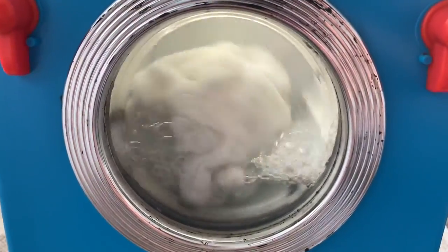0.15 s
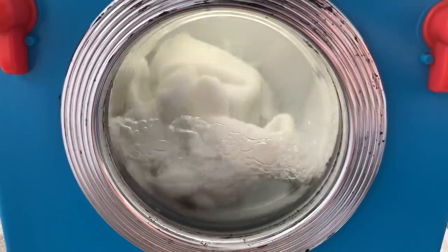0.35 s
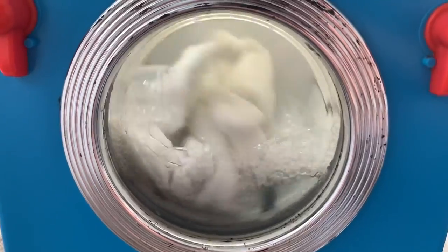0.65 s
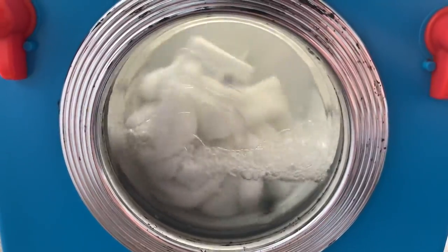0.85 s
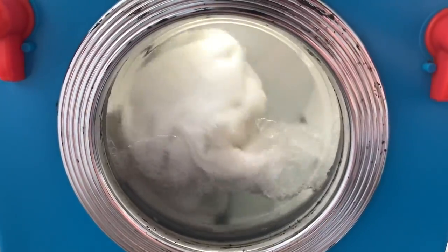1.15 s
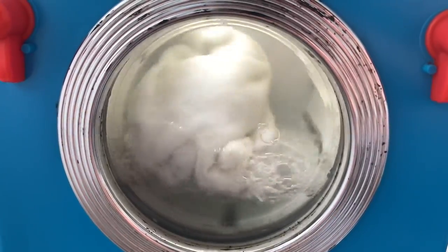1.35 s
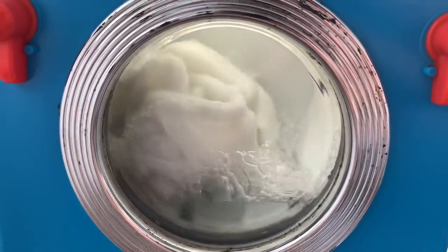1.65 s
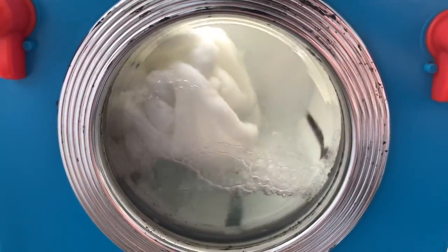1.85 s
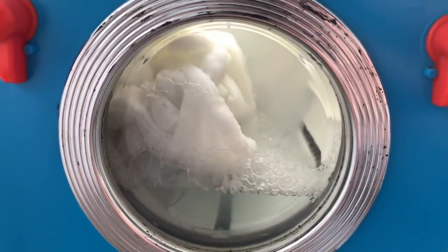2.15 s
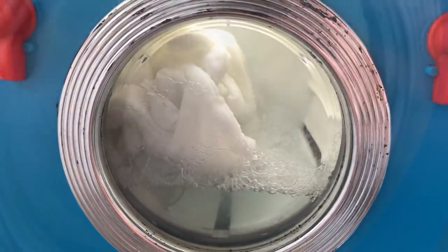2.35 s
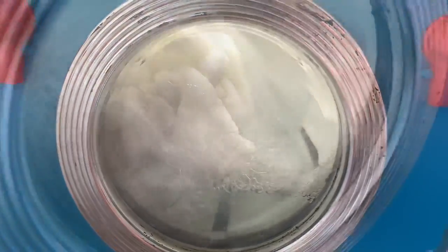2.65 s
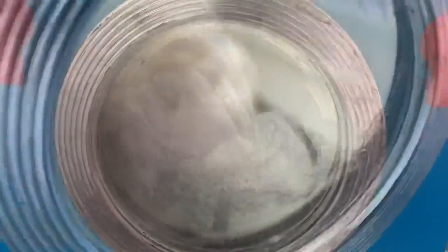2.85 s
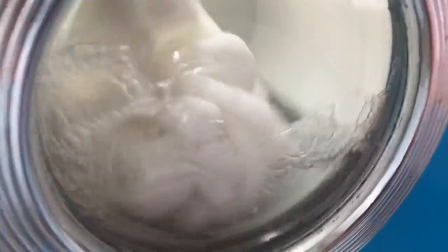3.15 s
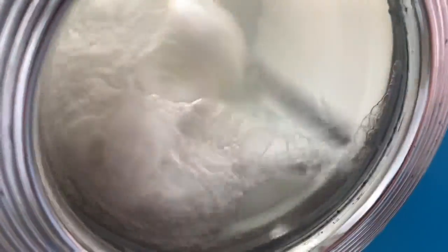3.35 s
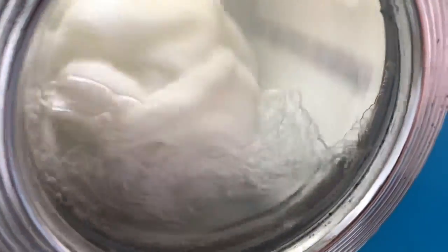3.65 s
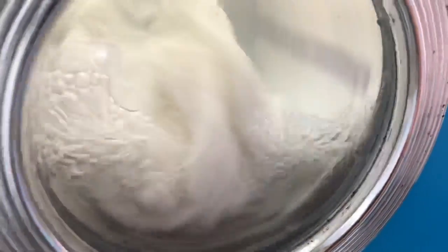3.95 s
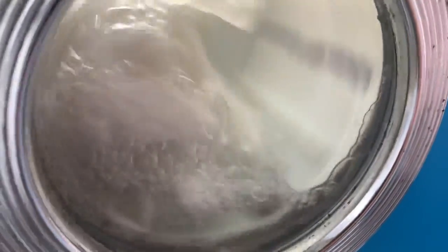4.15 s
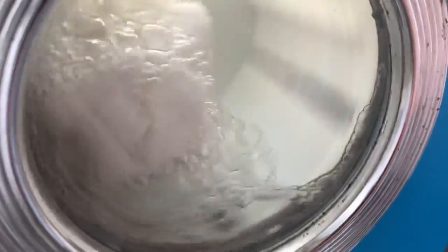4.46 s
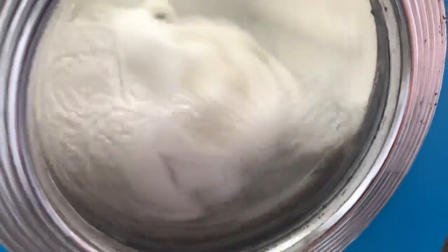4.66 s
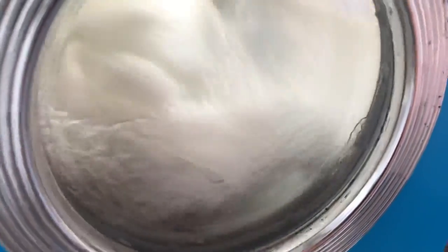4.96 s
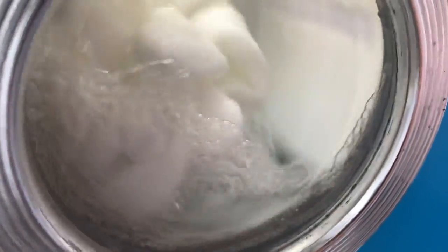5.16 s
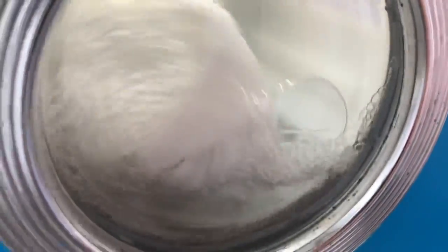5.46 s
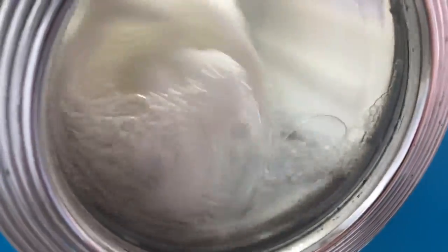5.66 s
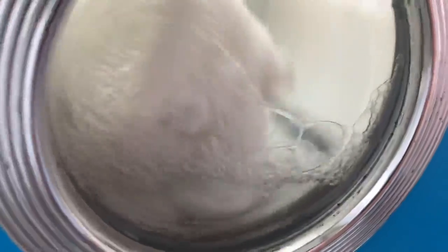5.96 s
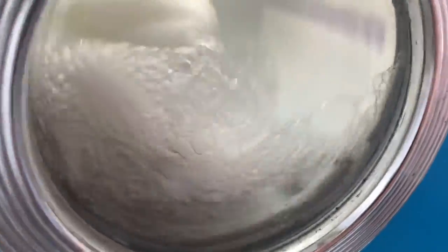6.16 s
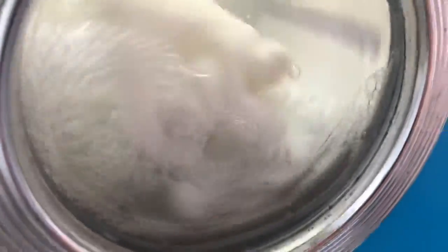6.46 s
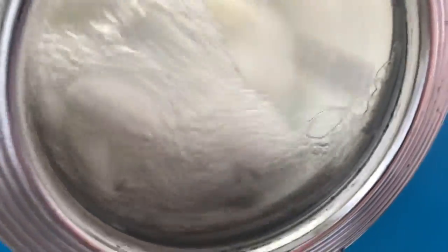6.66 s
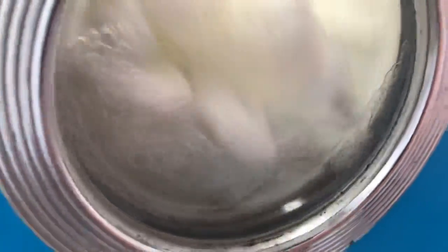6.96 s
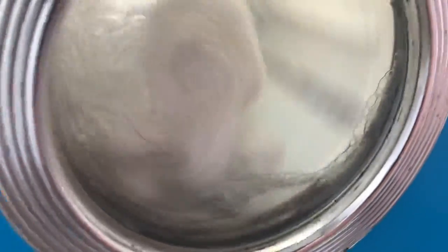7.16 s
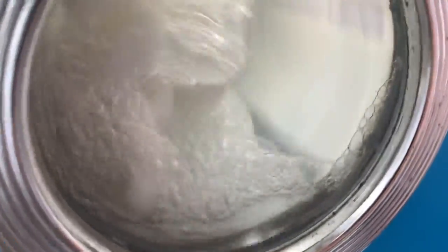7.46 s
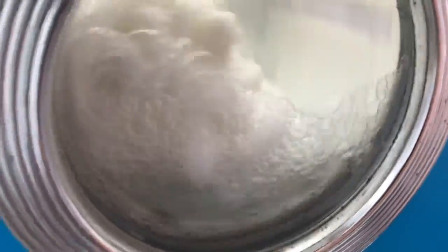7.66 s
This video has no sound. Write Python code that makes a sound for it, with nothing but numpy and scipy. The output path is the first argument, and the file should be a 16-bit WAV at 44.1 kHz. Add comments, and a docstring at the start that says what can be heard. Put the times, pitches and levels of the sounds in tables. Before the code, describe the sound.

A small toy washing machine runs in a quiet little room, heard in stereo. From 0 to 1.6 seconds its geared motor whirrs thinly at a distance, with soft slosh, low gulps and light taps; between 1.1 and 1.5 the wet load knocks harder, with a short thin swish near 1.4. The motor coasts to rest by 2.0, leaving low hum, still air and a faint high whine. At about 2.3 it starts again, spinning up until 3.0, now closer and louder, a steady buzzy gear hiss. Hollow plastic knocks fall irregularly, clustered around 2.9 to 3.1, strong at 3.65, 4.3, 5.7, 6.4 and 7.6. Each stirs splashes, spray and foamy crackle; air pockets pop, clearly at 2.9, 5.6 and 6.5. From 3.1 a brief fizzy swish returns roughly every 0.6 seconds. The motor is still running at the end, near 7.8.

```python
"""A geared motor whirrs at some distance and water sloshes: a toy washing machine tumbles a wet cloth.
The load knocks in the plastic drum as ringing modes; the motor rests, then runs again, heard from closer by.
The rim swishes about once a turn as a burst of coloured noise; spray, foam and air pockets are noise and bubbles.
A low hum and still air lie beneath, and a faint whine marks the pause; two microphone ports hear it all."""
import sys
import numpy as np
from scipy import signal
from scipy.fft import rfft, irfft, next_fast_len
from scipy.io import wavfile
from scipy.ndimage import map_coordinates

SR = 44100
rng = np.random.default_rng(int(sys.argv[2]) if len(sys.argv) > 2 else 0)


def log_audio(samples):
    """Write samples as a 16-bit WAV file to the path given in sys.argv[1]."""
    # one column per channel
    frames = np.atleast_2d(samples).T
    # limit to full scale, then quantise
    limited = np.clip(frames, -1, 1)
    pcm = np.round(limited * 32767).astype(np.int16)
    wavfile.write(sys.argv[1], SR, pcm)


N = 344421  # length in samples

# The load knocking in the drum. Each row: time in seconds, level in dB, then trims in dB of thump, clack
# and tick against the shell, and the pitch in Hz that the place of the blow favours.
KNOCK_ROWS = [(0.4165, -50, 7.5, -19, -32, 455), (0.606, -58.5, -1, -2, -25, 1770),
              (0.714, -58, 5, -27, -22, 556), (1.1139, -43, 0.5, -5, -11, 1160),
              (1.1597, -42.5, -7, -11, -14, 1770), (1.237, -38, 3.5, 3, -4.5, 950),
              (1.262, -42.5, 0, -10, -22, 620), (1.4144, -40, 0, -14, -3, 1700),
              (1.4213, -34, -5, -11.5, -17, 590), (1.509, -31.5, 0, -38, -28, 586),
              (2.3201, -44.5, -0.5, -7.5, -16, 1140), (2.433, -37.5, 0, -8, -17, 1346),
              (2.6466, -51.5, 2, -7, -10, 971), (2.807, -55, 4, -3, -16, 2460),
              (2.875, -39, -12, -4.5, -39, 930), (2.8967, -36.5, -19, -4, -26, 1680),
              (2.9038, -44, 2, -11, -12, 1120), (2.9338, -40, 0, -5, -34, 1820),
              (3.026, -33.5, 2, -9, -10, 650), (3.0577, -31.5, 5, -6.5, -7.5, 689),
              (3.2754, -42.5, -0.5, -8.5, -25, 745), (3.4339, -45.5, 4, -10, -11, 950),
              (3.565, -62.5, -14, 13.5, -6, 2530), (3.6095, -29.5, -1.5, 4, -3, 1710),
              (3.6232, -30.5, 1, -1.5, -15, 960), (3.646, -22.5, -3, -6, -3, 630),
              (3.6495, -28, 2, 3, -24, 590), (3.6525, -32.5, 13, -19, -25, 346),
              (3.9054, -40, -2, 1, -32, 1520), (3.996, -36, 4.5, -3.5, -12.5, 1780),
              (4.0344, -39, 7, -6.5, -9, 484), (4.213, -46.5, -10, -8, -26, 980),
              (4.2719, -41, -4, 10, 4, 1770), (4.2746, -29.5, 3.5, 0, -5.5, 600),
              (4.3023, -28, 3.5, 1, -8, 1730), (4.317, -33.5, -9, -12, -18, 540),
              (4.3482, -29.5, 4, -10, -14, 905), (4.6229, -32.5, 7, 1.5, -4, 1136),
              (4.7492, -45, -8, -20, -26, 1160), (4.915, -43, -3, -10, -11, 1250),
              (5.049, -35.5, -6, 4.5, -18, 1640), (5.1349, -35.5, 0, -3, 7, 1090),
              (5.1624, -30.5, 5, -8.5, -16, 650), (5.2305, -40.5, -11, -10, -18, 1050),
              (5.368, -37, 8, -12, -48, 580), (5.438, -38.5, -16, 3.5, -18, 1910),
              (5.4758, -40.5, 1, -6, -13, 950), (5.5391, -44, -9, -4, -11, 1020),
              (5.6058, -36.5, -4, -12, -11, 955), (5.7158, -24.5, -6, -14, -28, 690),
              (5.8062, -46.5, 6, -24, -31, 654), (5.85, -44, 5, -20, -31, 455),
              (5.875, -45, -8, -6.5, -23, 1170), (6.023, -33, -12, 3, -3.5, 1890),
              (6.0757, -33.5, -6.5, -2.5, -10, 950), (6.2948, -47, -4, -13, -18, 1610),
              (6.384, -40.5, -5, -11, -16, 930), (6.4265, -28, -5.5, -5, -13, 990),
              (6.443, -34.5, 8, -7.5, -12, 600), (6.5212, -42.5, 3.5, -27, -34, 990),
              (6.6315, -40.5, -0.5, -13, -20, 1040), (6.951, -43.5, 5, -22, -11, 1000),
              (7.016, -50.5, 13.5, -0.5, -8, 460), (7.0409, -38.5, 0, -3, -18, 1320),
              (7.1902, -42.5, 5, 0.5, -45, 1890), (7.2662, -47, 6, -1, -8, 970),
              (7.527, -38.5, -11, -6, -25, 960), (7.5383, -39.5, 0.5, 3.5, -14.5, 1690),
              (7.63, -27.5, 1, -1, -12, 288), (7.745, -44.5, -15, -11, -23, 990),
              (7.773, -38.5, -2.5, -10, -32, 670), (7.804, -42.5, -6, -5.5, -11, 1000)]
# The rim at its tight spot. Each row: time in seconds, swish gain in dB ahead of its envelope.
SWISH_ROWS = [(0.45, -85), (0.9, -79), (1.3678, -43.5), (3.1378, -45.5), (3.7606, -46), (4.4933, -43.5),
              (4.996, -42), (5.5802, -47.5), (6.1414, -44.5), (6.708, -44), (7.291, -47.5), (7.784, -45.5)]

STOP_S, REST_S = 1.57, 1.97  # the motor is cut, and has coasted to rest
START_S, SPIN_UP_S = 2.31, 0.72  # it starts again, and takes this long to full drive
FIRM_KNOCK_DB = -32  # a knock this loud counts as fully firm


def amp(db):
    """Decibels to gain."""
    return 10 ** (np.asarray(db) / 20)


def unit(x):
    """Scaled to rms 1."""
    return x / np.sqrt(np.mean(x ** 2) + 1e-20)


def along(points, hz):
    """(Hz, value) points read on a log frequency axis."""
    f, v = np.transpose(points)
    return np.interp(np.log(hz + 1), np.log(f + 1), v)


def curves(rows):
    """One value per sample for each column after the time."""
    s, *cols = np.transpose(rows)
    return [np.interp(np.arange(N) / SR, s, c) for c in cols]


def wobble(rate):
    """A smooth random curve, rate knots a second."""
    knots = rng.standard_normal(int(N * rate / SR) + 4)
    return map_coordinates(knots, [np.arange(N) * rate / SR])


def filtered(x, response):
    """x times a response of frequency."""
    m = next_fast_len(N + 8192)
    return irfft(rfft(x, m) * response(np.fft.rfftfreq(m, 1 / SR)), m)[..., :N]


def panned(x, db):
    """Left louder than right by db."""
    gains = amp([[db / 2], [-db / 2]])
    return x * unit(gains)


def noise():
    """Two channels of white noise."""
    return rng.standard_normal((2, N))


def resonances(modes, hz):
    """Summed response of (Hz, width in Hz, dB) resonances."""
    return sum(amp(db) * 1j * hz * width / (centre ** 2 - hz ** 2 + 1j * hz * width)
               for centre, width, db in modes)


def spread(pair, spectrum, modes=()):
    """Two unrelated signals become one stereo sound of rms 1, coloured by a spectrum and any resonances."""
    # How alike left and right are in a spread sound. Each row: frequency in Hz, likeness up to 1.
    likeness = [(60, 0.94), (280, 0.95), (550, 0.66), (1000, 0.1), (4000, 0.041), (6500, 0.77), (8500, 1),
                (14000, 0.96)]

    def mid_side_response(hz):
        turn = np.arccos(np.clip(along(likeness, hz), -1, 1)) / 2
        colour = np.hypot(amp(along(spectrum, hz)), abs(resonances(modes, hz)))
        return colour * [np.cos(turn), np.sin(turn)]

    mid, side = filtered(pair, mid_side_response)
    return unit(np.array([mid + side, mid - side]))


def add(track, s, sound):
    """Mixes a sound into a track at a time in seconds."""
    start = int(np.clip(round(s * SR), 0, N - 1))
    track[:, start:start + sound.shape[1]] += sound[:, :N - start]


def bubbles(centre_hz, cycles, scatter_db, count):
    """Short, heavily damped rings of random pitch and size at random times, together at rms 1."""
    when, pitch, size = rng.random(count), rng.standard_normal(count), rng.exponential(size=count)
    life = np.arange(int(min(10 * cycles / centre_hz * SR, SR // 25)))
    turns = centre_hz * np.exp(.33 * pitch)[:, None] * life / SR
    ring = np.sin(2 * np.pi * turns) * np.exp(-turns / cycles) * (1 - np.exp(-2 * turns))
    ring = ring * amp(scatter_db * np.minimum(size, 2))[:, None]
    at = (when * N).astype(int)[:, None] + life
    return unit(np.bincount(at.ravel(), ring.ravel(), N)[:N])


def bubble_pair(*args, **settings):
    """Two unrelated channels of bubbles."""
    return np.array([bubbles(*args, **settings) for port in range(2)])


def drive():
    """Drive of the first and second run, 0 to 1: one coasts to rest, the other spins up."""
    t = np.arange(N) / SR
    coasting = np.clip((REST_S - t) / (REST_S - STOP_S), 0, 1)
    spinning_up = np.clip((t - START_S) / SPIN_UP_S, 0, 1)
    return coasting, spinning_up


def drag():
    """The gears labour just after the rim meets its tight spot: extra gear noise in dB."""
    rise_db, half_s, lag_s = 2.5, 0.22, 0.09
    t = np.arange(N) / SR
    return rise_db * sum(np.exp(-((t - s - lag_s) / half_s) ** 2) for s, _ in SWISH_ROWS)


def motor(run, hiss_spectrum, housing, mesh_hz, jitter, hiss_db, mesh_db, brush_db, waver,
          hiss_grows, mesh_grows):
    """Gear teeth mesh unsteadily, their flanks hiss in the gearbox, brushes tick once a turn; all grow with drive."""
    pinion_teeth, wheel_teeth = 10, 64
    wheel_pulse_db, tooth_flutter_db = 2.6, 3
    # Colour of the brush ticks. Each row: frequency in Hz, level in dB.
    spark_colour = [(6000, -70), (12300, -15), (13200, -4), (14500, -2), (15300, -10), (16000, -12)]
    rate = mesh_hz * (1 + waver * wobble(9))
    rotor = np.cumsum(rate / pinion_teeth * (1 + 0.07 * wobble(40))) / SR
    wheel = np.cumsum(rate / wheel_teeth * (1 + 0.05 * wobble(20))) / SR
    rub_db = wheel_pulse_db * (np.cos(np.pi * wheel) ** 8 - 1 / 4)  # the wheel rubs harder once a turn

    hiss_level = amp(hiss_db + 1.1 * wobble(105) + 0.64 * wobble(21))
    hiss = hiss_level * spread(noise(), hiss_spectrum, housing)
    tick_level = amp(3.6 * np.cos(2 * np.pi * rotor) + 2.2 * wobble(110))
    ticks = amp(brush_db) * unit(tick_level * spread(noise(), spark_colour))

    def tooth_tone():
        turns = np.cumsum(rate * (1 + jitter * wobble(260))) / SR
        return np.sin(2 * np.pi * turns) * amp(tooth_flutter_db * wobble(70))

    teeth = amp(mesh_db) * unit(np.array([tooth_tone() for port in range(2)]))
    rubbing = run ** hiss_grows * hiss + run ** 1.5 * ticks
    return amp(drag() + rub_db) * rubbing + run ** mesh_grows * teeth


def chatter(weight, lead, count):
    """A heavy blow is a cluster: light touches just before it, quick rebounds, then a few stray bounces."""
    bounce_db, bounce_s = -23, .045
    contacts = np.zeros(SR // 10)
    early, late, stray = rng.random((3, count))
    touch_at = (lead * (1 - early) * SR).astype(int)
    rebound_at = ((lead + .012 * late) * SR).astype(int)
    bounce_at = ((lead + bounce_s * stray) * SR).astype(int)
    contacts[touch_at] += .08 * (1 - early) ** 2 * rng.standard_normal(count)
    contacts[rebound_at] += .22 * (1 - late) * rng.standard_normal(count)
    contacts[bounce_at] += amp(bounce_db) * (1 - stray) * rng.standard_normal(count)
    contacts = weight * contacts
    contacts[int(lead * SR)] = 1  # the blow itself
    return contacts


def knock_band(contacts, ring_hz, lo_hz, hi_hz, dense_db, dense_t60, attack):
    """One register of a knock, with the energy of 10 ms at rms 1: plastic modes plus dense, fast-dying ones."""
    # Modes of drum and housing. Each row: nominal pitch in Hz, relative level in dB, nominal t60 in seconds.
    plastic_modes = [(228.3, -9, .2), (291.8, 4, 0.11), (344, 1.5, .11), (402, -0.5, 0.071),
                     (445, -3, 0.058), (511.5, -2, 0.071), (590.4, 2, .12), (650, 3, .09), (741, 1, 0.096),
                     (956, 1, 0.054), (1175, -2, 0.048), (1343, -6.5, 0.086), (1595, 7.5, 0.047),
                     (1763, 4, 0.062), (1928, 8, 0.047), (2468, 4.5, 0.041), (2846, 2, .031),
                     (3327, 5.5, 0.026)]
    alike = 0.76  # a knock reaches both microphone ports almost alike
    t = np.arange(SR // 7) / SR
    in_band = [m for m in plastic_modes if lo_hz <= m[0] < hi_hz] or [(lo_hz, -120, dense_t60)]
    hz, db, t60 = np.array(in_band).T[..., None]
    db = db + 8 * np.exp(-(np.log(hz / ring_hz) / 0.13) ** 2)  # the place of the blow favours one mode

    turn = np.arccos(np.clip(alike, -1, 1)) / 2 * min(hi_hz / 1000, 1)  # the bass is nearly mono
    apart = turn * rng.standard_normal(hz.shape)
    detuned = hz * (1 + 0.006 * rng.standard_normal(hz.shape))
    phase = 2 * np.pi * (detuned * t + rng.random(hz.shape))
    decay = amp(db + 2 * rng.standard_normal(hz.shape) - 60 * t / t60)
    decay = decay * (1 + 2.0 * np.exp(-hz * t / 4.4))  # the first few swings are the widest
    modes = np.array([(decay * np.sin(phase + side * apart)).sum(0) for side in (1, -1)])

    band = signal.butter(2, [lo_hz, min(hi_hz, SR / 2 - 1000)], "band", fs=SR, output="sos")
    mid, side = rng.standard_normal((2, len(t))) * amp(-60 * t / dense_t60)
    burst = signal.sosfilt(band, np.cos(turn) * mid + np.sin(turn) * np.array([side, -side]))

    ring = modes / (np.linalg.norm(modes) + 1) + amp(dense_db) * burst / np.linalg.norm(burst)
    ring = signal.fftconvolve(ring * (1 - np.exp(-t / attack)), contacts[None], axes=1)
    return ring / np.linalg.norm(ring.mean(0)) * np.sqrt(SR / 100)


def knocks():
    """The load strikes the drum: tick, clack, shell and hollow ring speak fast, housing thump and boom swell slower."""
    out = np.zeros((2, N))
    lead = .005  # seconds of light touches ahead of the blow
    hollow_left_db, shell_left_db, clack_left_db = 11, 6, 2.5
    hollow_per_db, hollow_max_db = 0.5, 2
    for s, db, thump_db, clack_db, tick_db, ring_hz in KNOCK_ROWS:
        weight = min(amp(db - FIRM_KNOCK_DB), 1)  # light taps are nearly single, clean contacts
        blow = chatter(weight, lead, count=4)
        # heavy, dull blows reach further into the drum's hollow ring
        hollow_db = min(hollow_per_db * (thump_db - clack_db + db - FIRM_KNOCK_DB), hollow_max_db)
        thump = amp(thump_db - 0.86) * knock_band(
            blow, ring_hz, 240, 483, dense_db=-7.0, dense_t60=0.099, attack=0.0043)
        boom = amp(thump_db - 18.5) * knock_band(
            blow, ring_hz, 79, 233, dense_db=0, dense_t60=0.24, attack=0.019)
        hollow = amp(hollow_db + 1.0) * knock_band(
            blow, ring_hz, 480, 800, dense_db=-10, dense_t60=0.06, attack=0.0011)
        shell = amp(-1.5) * knock_band(
            blow, ring_hz, 744, 1510, dense_db=-3.5, dense_t60=0.055, attack=0.00046)
        strike = blow * (np.arange(len(blow)) / SR < lead + .006)  # later wet bounces are too soft to clack
        clack = amp(clack_db + 1.5) * knock_band(
            strike, ring_hz, 1100, 3500, dense_db=-6.5, dense_t60=0.021, attack=0.0004)
        tick = amp(tick_db - 1.5) * knock_band(
            strike, ring_hz, 3700, 15600, dense_db=-4.0, dense_t60=0.011, attack=0.000088)
        drum = panned(hollow, hollow_left_db) + panned(shell, shell_left_db)
        knock = thump + boom + drum + panned(clack + tick, clack_left_db)
        add(out, s - lead - .0003, amp(db) * knock)
    softened_top = [(3000, -1.5), (4200, -2.5), (6500, -4.0), (15000, -12.5)]  # Hz, dB
    return filtered(out, lambda hz: amp(along(softened_top, hz)))


def rim():
    """About once a turn the wet rim rubs past a tight spot: a short, thin swish with a trailing fizz."""
    # Colour of the swish. Each row: frequency in Hz, level in dB.
    swish_colour = [(2500, 0.5), (6500, -2), (7600, 0), (9000, 5), (13000, 7), (15400, 7), (16200, -9)]
    level, t = np.zeros(N), np.arange(N) / SR
    for s, db in SWISH_ROWS:
        age = np.maximum(t - s + 0.0026, 0)
        fading = np.exp(-age / 0.011) + 0.17 * np.exp(-age / 0.029)
        level += amp(db) * (1 - np.exp(-age / 0.0017)) * fading
    return level * spread(noise(), swish_colour)


def stir():
    """The water heaves as the load falls and settles after each knock; light knocks stir it less."""
    rise_s, settle_s = 0.039, 0.11
    limit = 1.9  # it heaves no harder than for this many firm knocks at once
    t = np.arange(N) / SR
    power = np.zeros(N)
    for s, db, *_ in KNOCK_ROWS:
        age = t - s
        swell = np.exp(np.minimum(age / rise_s, -age / settle_s))
        power += (min(amp(db - FIRM_KNOCK_DB), 1) * swell) ** 2
    return np.sqrt(power / (1 + power / limit))


def water():
    """Water gulps in the tub, the wet cloth slaps and drips over a soft wash; the drum and the knocks stir both."""
    # Colour of the water in the tub. Each row: frequency in Hz, level in dB.
    slosh_colour = [(25, -32), (45, -31), (70, 6), (110, 4), (145, -1.5), (200, -2.5), (235, 5),
                    (262, -10.5), (300, 6.5), (370, -2.5), (450, -4), (700, -27), (1500, -72)]
    # Colour of the slapping, dripping cloth. Each row: frequency in Hz, level in dB.
    splash_colour = [(250, -2), (480, 2), (700, 3.5), (820, -1), (970, 4.5), (1300, 3.5), (1800, 3),
                     (2200, -14), (2600, -23), (4000, -40), (9000, -70)]
    # base levels in dB for the pause, the distant first run, the close second run, and a full heave
    slosh_rest_db, slosh_far_db, slosh_near_db, slosh_stir_db = -72.5, -66.5, -53.5, -51.5
    splash_rest_db, splash_far_db, splash_near_db, splash_stir_db = -81, -64, -59.5, -54
    far, near = np.array(drive()) ** 1.04
    heave = stir()
    slosh_turning = amp(slosh_rest_db) + amp(slosh_far_db) * far + amp(slosh_near_db) * near
    slosh_level = np.hypot(slosh_turning, amp(slosh_stir_db) * heave)
    splash_turning = amp(splash_rest_db) + amp(splash_far_db) * far + amp(splash_near_db) * near
    splash_level = np.hypot(splash_turning, amp(splash_stir_db) * heave)

    gulps = bubble_pair(278.7, cycles=2.4, scatter_db=4.5, count=420)
    drops = bubble_pair(820, cycles=2.2, scatter_db=4, count=900)
    slosh = amp(-1.5) * spread(noise(), slosh_colour) + amp(-0.5) * spread(gulps, slosh_colour)
    wash = amp(-3.0) * spread(noise(), splash_colour)
    drips = amp(-2.5 + 2.8 * wobble(14)) * spread(drops, splash_colour)  # they come in clumps
    slosh = slosh_level * amp(1.53 * wobble(22)) * slosh
    splash = splash_level * amp(2.3 * wobble(9.1)) * (wash + drips)
    return slosh + panned(splash, db=6.0)


def spray(hits, level_db, settle):
    """Each sharp blow shakes water from the cloth; it patters down, dying with a settle time in seconds."""
    # Colour of the spray. Each row: frequency in Hz, level in dB.
    spray_colour = [(300, -28), (600, 10.5), (1800, 11.5), (4500, -11), (7000, -5), (9000, -27),
                    (15000, -18)]
    sharp = signal.sosfilt(signal.butter(2, 1200, "high", fs=SR, output="sos"), hits)
    keep = np.exp(-1 / (settle * SR))
    shaken = np.sqrt(signal.lfilter([1 - keep], [1, -keep], np.mean(sharp ** 2, axis=0)))
    patter = bubble_pair(2200, cycles=0.44, scatter_db=7.0, count=1200)
    drizzle = spread(patter + amp(3.5) * noise(), spray_colour)
    return amp(level_db + 3.8 * wobble(140)) * shaken * drizzle


def plops(count):
    """Air pockets in the folds ring briefly and rise in pitch: a few clear ones, and small blips in the second run."""
    # Clear pops. Each row: start in seconds, starting pitch in Hz, level in dB, t60 in seconds.
    clear_pops = [(0.075, 330, -43, 0.036), (0.254, 294, -43.5, 0.052), (1.378, 132, -40.5, 0.11),
                  (2.67, 1600, -44, .03), (2.8962, 970, -25, 0.055), (2.8975, 1540, -30, .035),
                  (4.2155, 1024, -35, .03), (5.609, 956, -28.5, 0.04), (5.809, 305, -29.5, 0.069),
                  (6.145, 158, -35, 0.045), (6.531, 990, -31, 0.031), (6.948, 1002, -31, 0.028)]
    rise_per_s, attack_s = 1.2, 0.00053  # pitch climbs by this share a second; soft start
    blip_db, blip_scatter_db, blip_hz, blip_octaves, blip_cycles = -56, 11, 810, 1.37, 22
    out, t = np.zeros((2, N)), np.arange(SR // 10) / SR
    first = START_S + SPIN_UP_S / 2
    chance = rng.random((count, 3))
    times = first + (N / SR - first) * (np.arange(count) + chance[:, 0]) / count
    pitches = blip_hz * 2 ** (blip_octaves * (2 * chance[:, 1] - 1))
    levels = blip_db + blip_scatter_db * (2 * chance[:, 2] - 1)
    blips = zip(times, pitches, levels, blip_cycles / pitches)
    for s, hz, db, t60 in [*clear_pops, *blips]:
        phase = 2 * np.pi * hz * (t + rise_per_s * t ** 2 / 2)
        pop = amp(db - 60 * t / t60) * (1 - np.exp(-t / attack_s)) * np.sin(phase)
        add(out, s, panned(pop, db=11 * min(hz / 1000, 1)))  # deep gulps stay nearer the middle
    return out


def squelch():
    """Each fall squeezes foam out of the cloth: a fine, clumpy crackle that follows the heave."""
    # Colour of squeezed wet cloth. Each row: frequency in Hz, level in dB.
    squelch_colour = [(800, -4), (2200, 0), (3200, -7), (5000, 4), (7000, -5), (9000, -46)]
    foam = bubble_pair(3200, cycles=2.2, scatter_db=11, count=2600)
    level = amp(-67 + 1.6 * wobble(8.4)) * np.minimum(stir(), 1)
    return level * spread(foam + noise(), squelch_colour)


def squishes():
    """The cloth drags along the drum and foam crackles in uneven spurts; each drag swells and fades."""
    # Drags of the cloth. Each row: time of the height in seconds, half length in seconds, level in dB.
    drags = [(0.475, 0.099, -63.5), (1.223, 0.023, -55), (1.287, 0.026, -56), (1.39, 0.019, -71),
             (3.373, .014, -56), (3.55, 0.031, -54.5), (4.273, 0.011, -40), (5.556, 0.023, -48),
             (6.678, 0.039, -55.5)]
    # Colour of the foam. Each row: frequency in Hz, level in dB.
    foam_colour = [(500, -14), (1000, 4), (1800, 1), (2600, 1), (3400, -4), (5000, -2.5), (7000, -12),
                   (9000, -21)]
    t = np.arange(N) / SR
    level = sum(amp(db) * np.exp(-((t - s) / half) ** 2) for s, half, db in drags)
    foam = bubble_pair(2740, cycles=1.1, scatter_db=5, count=2600)
    crackle = spread(foam + amp(10.0) * noise(), foam_colour)
    return panned(level * amp(2.0 * wobble(120)) * crackle, db=2.0)


def room(x):
    """The small room's tail: noise in which each frequency dies at its own speed."""
    # Decay of the room. Each row: frequency in Hz, t60 in seconds.
    room_decay = [(150, 0.53), (500, 0.32), (2000, 0.22), (6000, 0.2), (15000, 0.17)]
    hz, t, z = signal.stft(rng.standard_normal((2, SR // 2)), SR, nperseg=256)
    fading = amp(-60 * t / along(room_decay, hz)[:, None]) * (1 - np.exp(-t / 0.0017))
    tail = signal.istft(z * fading, SR, nperseg=256)[1]
    wet = signal.fftconvolve(x, tail / np.linalg.norm(tail[0]), axes=1)[:, :N]
    tail_colour = [(100, -2.5), (1000, -0.5), (4000, 3.0), (15000, 4.0)]  # Hz, dB
    return np.sqrt(np.mean(wet ** 2)) * spread(wet, tail_colour)


def room_tone():
    """A low wandering hum, a faint wavering whine in the pause, and still air as coloured noise."""
    # Level of the hum ahead of its small waver. Each row: time in seconds, level in dB.
    hum_level = [(0.0, -57), (0.55, -63.5), (0.75, -74), (1.4, -64.5), (3.7, -54.5), (4.35, -64),
                 (4.6, -62), (5.45, -79), (5.75, -64), (6.7, -57), (7.35, -59), (7.65, -60), (7.81, -67)]
    # Colour of the still air. Each row: frequency in Hz, level in dB.
    air_colour = [(20, -3.5), (60, 5), (200, -2), (500, -21.5), (1000, -21), (2000, -30), (5000, -37),
                  (16000, -37.5)]
    whine_hz, whine_db, whine_fade_db_per_s = 1320, -71, 4
    t = np.arange(N) / SR
    hum_turns = np.cumsum(51.5 + 0.6 * wobble(3.29)) / SR
    hum = amp(curves(hum_level)[0] + 1.1 * wobble(7.1)) * unit(np.sin(2 * np.pi * hum_turns))

    drift = np.cumsum(1 + 0.003 * wobble(30)) / SR
    fade_db = whine_fade_db_per_s * np.maximum(t - REST_S, 0)
    whine_level = amp(whine_db - fade_db + 1.5 * wobble(21)) * np.sqrt(2)
    whine = whine_level * np.sin(2 * np.pi * whine_hz * drift)
    # it swells once the motor rests and is gone soon after the restart
    whine = whine * np.interp(t, [1.96, 2.06, 2.22, 2.5], [0, 1, 1, 0])
    return hum + whine + amp(-63.5) * spread(noise(), air_colour)


def scene():
    """The machine in its room: the first run from afar, a pause, the second run from close by."""
    # Gear hiss from afar, then from close by. Each row: frequency in Hz, level in dB.
    far_hiss = [(900, -10), (1900, 8.5), (2400, 0.5), (2900, 5), (3600, -3), (4400, 1.5), (5200, 8.5),
                (6200, -15.5), (6900, 5), (7400, -15), (7900, 1.5), (10000, -20.5), (13700, -8),
                (15500, -15)]
    near_hiss = [(900, 1), (1900, 11.5), (2300, 7.5), (3700, 2), (4700, 5.5), (5250, 8.5), (5900, -3.5),
                 (7100, 6), (7600, -18), (8200, 1), (9300, -14), (12000, -11.5), (16000, -13)]
    # Gearbox resonances from afar, then from close by. Each row: frequency in Hz, width in Hz, level in dB.
    far_ring = [(1726, 20, 23), (4300, 130, 7), (4520, 90, 10), (5240, 50, 11.5)]
    near_ring = [(1610, 5, 25), (4710, 35, 16), (5180, 40, 19.5), (5340, 55, 17)]
    first, second = drive()
    far = motor(first, far_hiss, far_ring, mesh_hz=1735, jitter=.024, hiss_db=-68.5, mesh_db=-70,
                brush_db=-89, waver=0.0089, hiss_grows=0.81, mesh_grows=0.26)
    near = motor(second, near_hiss, near_ring, mesh_hz=1678, jitter=.014, hiss_db=-61.0, mesh_db=-62.5,
                 brush_db=-66, waver=0.0064, hiss_grows=0.76, mesh_grows=1.6)
    hits = knocks()
    hits = hits + spray(hits, level_db=-11.5, settle=0.0053) + plops(count=40)
    machine = far + near + hits + rim() + water() + squelch() + squishes()
    return machine + amp(-13.0) * room(hits) + room_tone()


def record(dry):
    """The two microphone ports hear the machine out of step; the recorder keeps nothing above its band limit."""
    # How far the left port leads the right. Each row: frequency in Hz, phase in radians.
    port_phase = [(150, 0), (430, .2), (690, 2.1), (820, 5.5), (1250, 8.3), (1800, 9.5), (2200, 10.8),
                  (3100, 15.5), (3500, 15.3), (4200, 10.2), (4900, 15.7), (5400, 15), (6200, 12.6),
                  (7200, 11.6), (7900, 9.6), (9400, 9.2), (10100, 6.4), (11800, 6.1), (12700, 3.3),
                  (13700, 3), (15300, .1)]
    top_hz = 15900

    def ports(hz):
        half_lead = along(port_phase, hz) / 2
        return (hz < top_hz) * np.exp(np.array([[1j], [-1j]]) * half_lead)

    return filtered(dry, ports)


dry = scene()
out = record(dry)
log_audio(out)
```